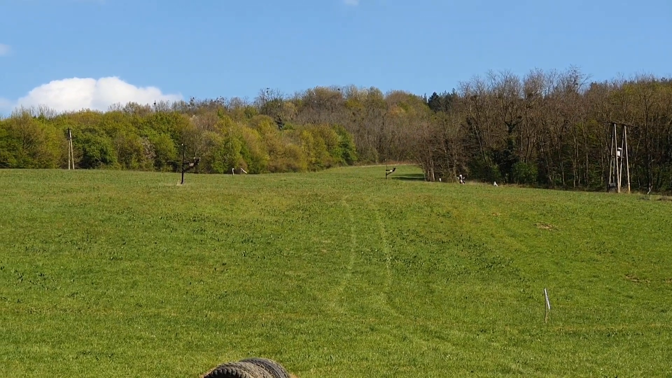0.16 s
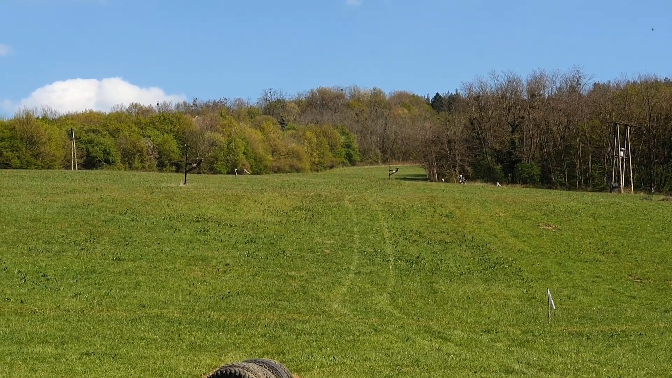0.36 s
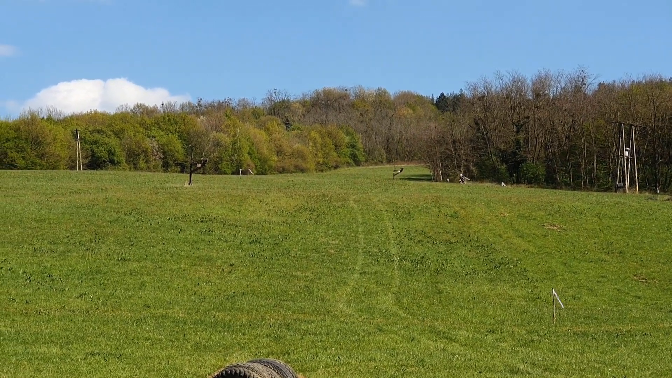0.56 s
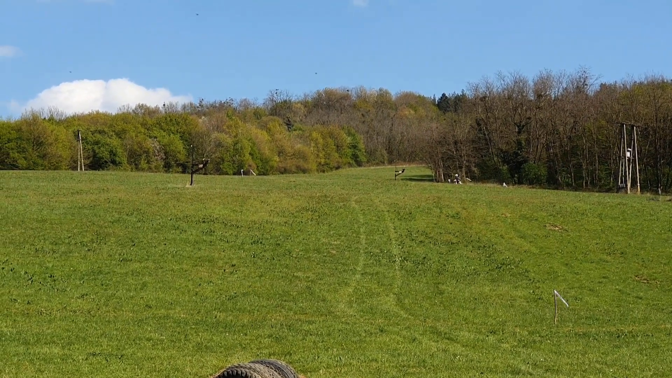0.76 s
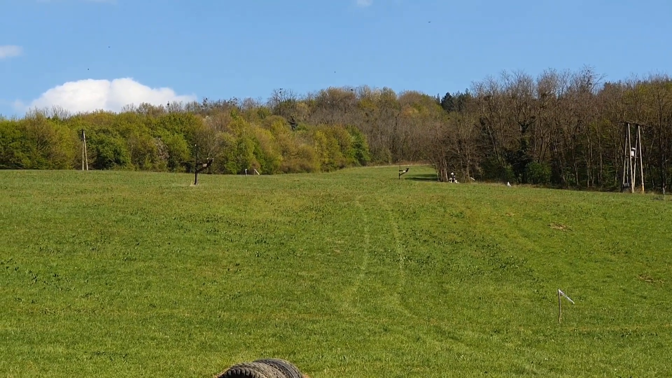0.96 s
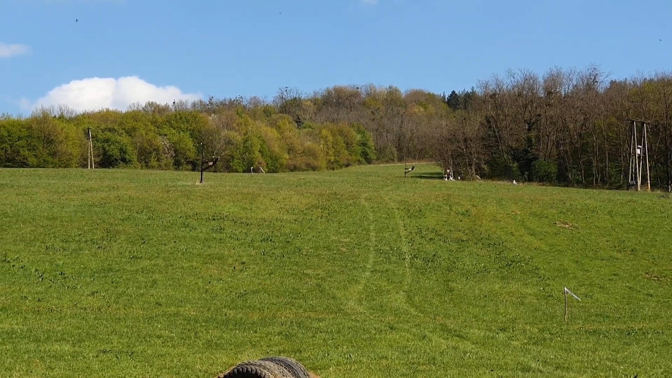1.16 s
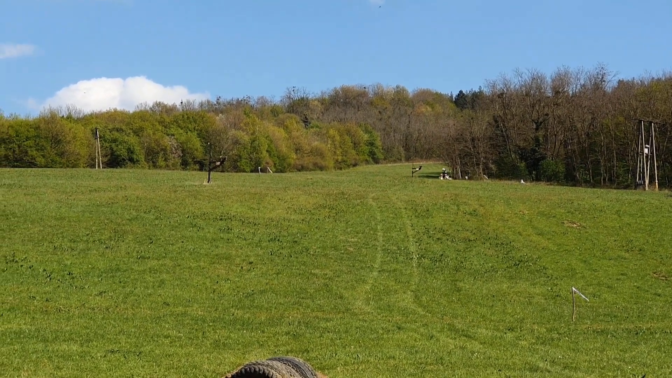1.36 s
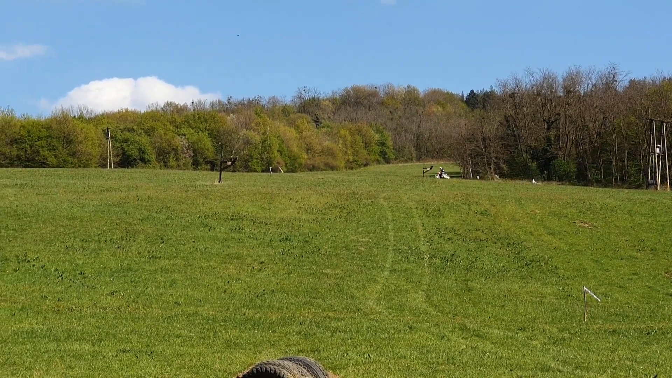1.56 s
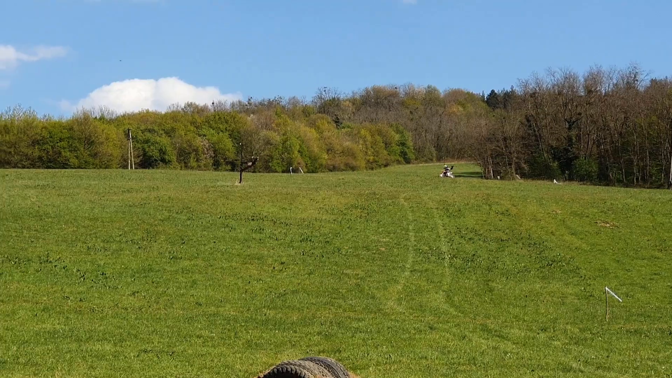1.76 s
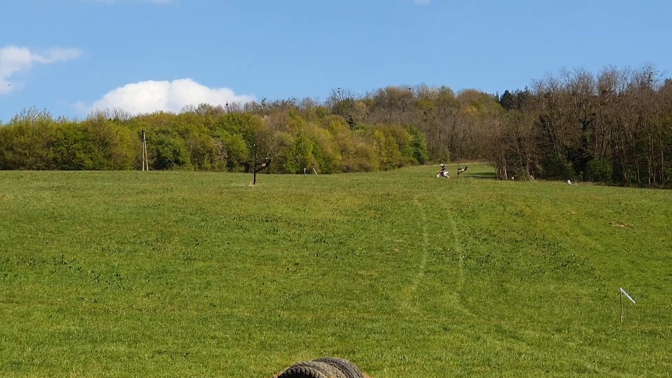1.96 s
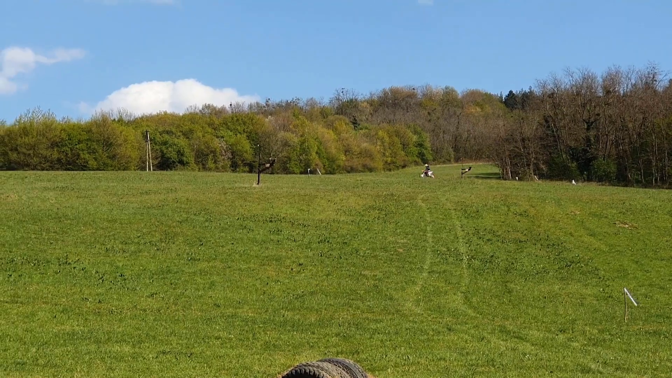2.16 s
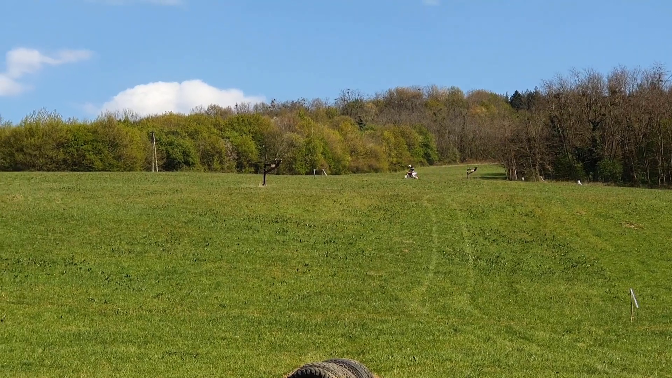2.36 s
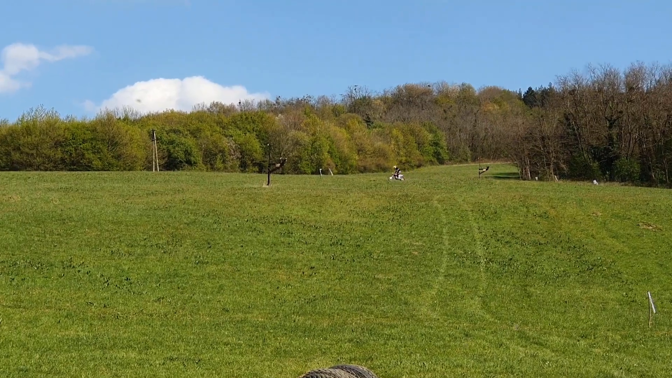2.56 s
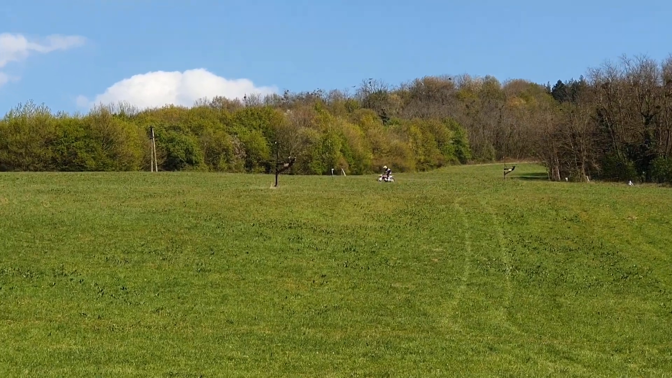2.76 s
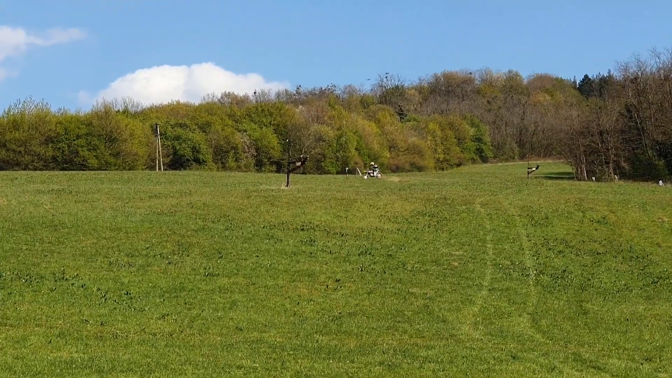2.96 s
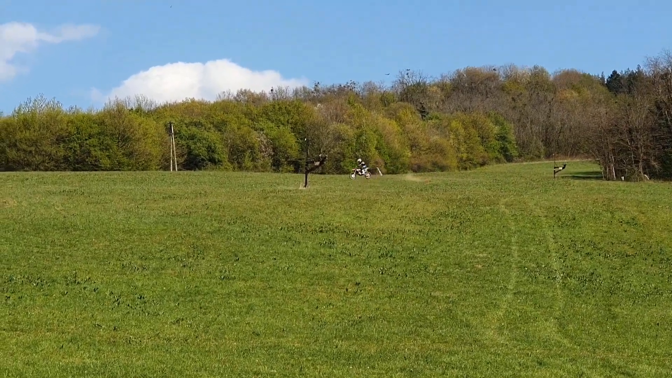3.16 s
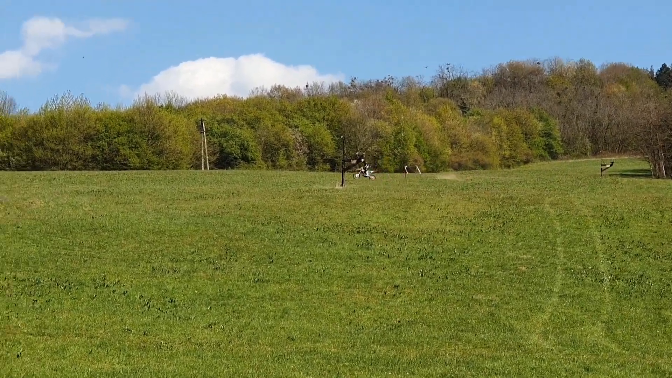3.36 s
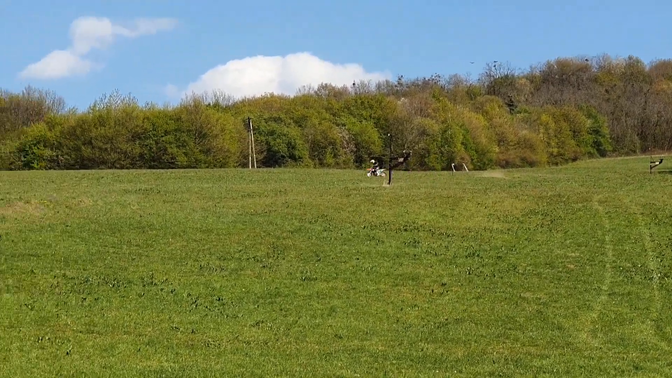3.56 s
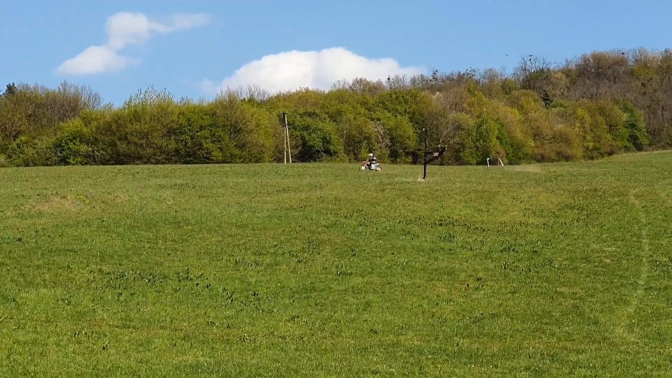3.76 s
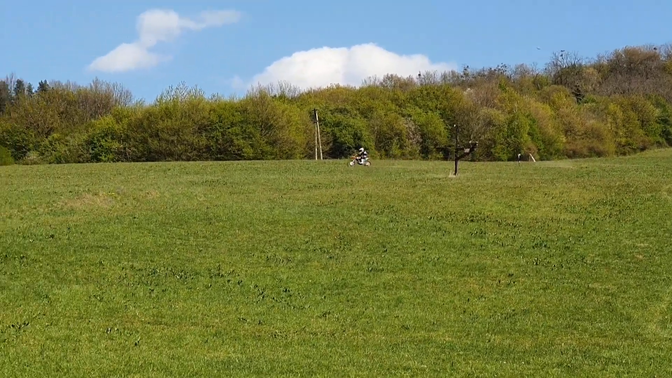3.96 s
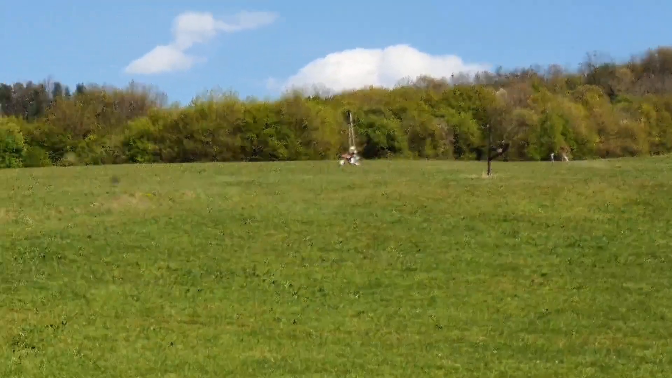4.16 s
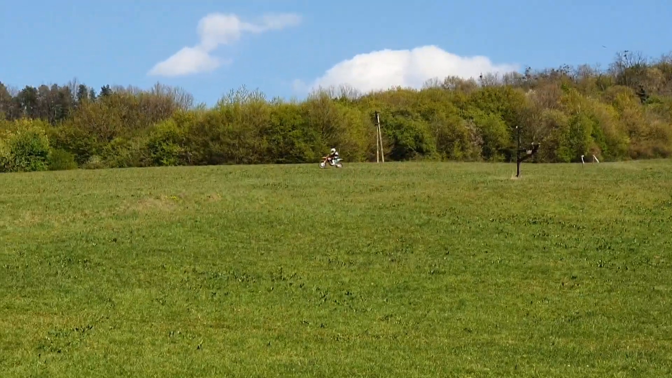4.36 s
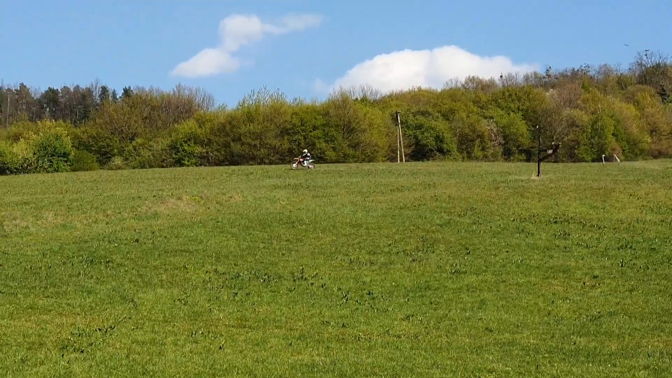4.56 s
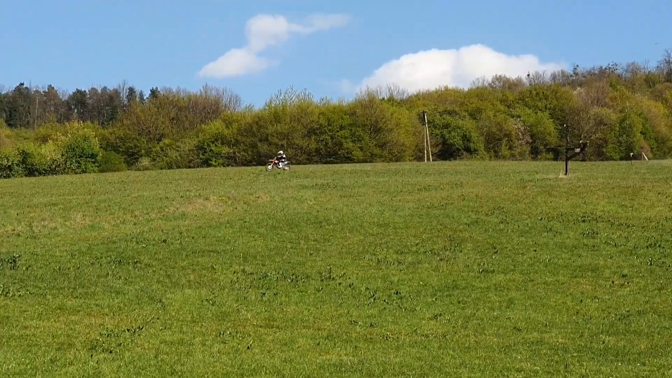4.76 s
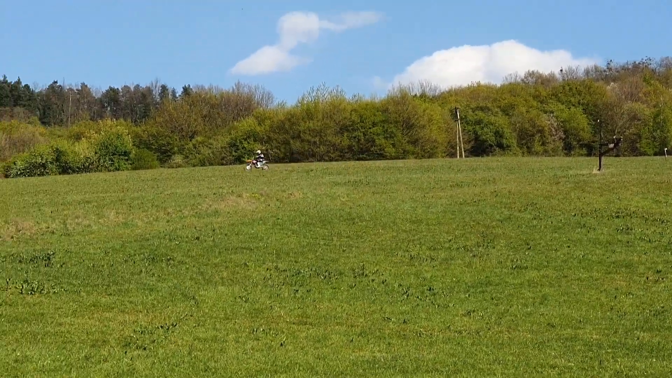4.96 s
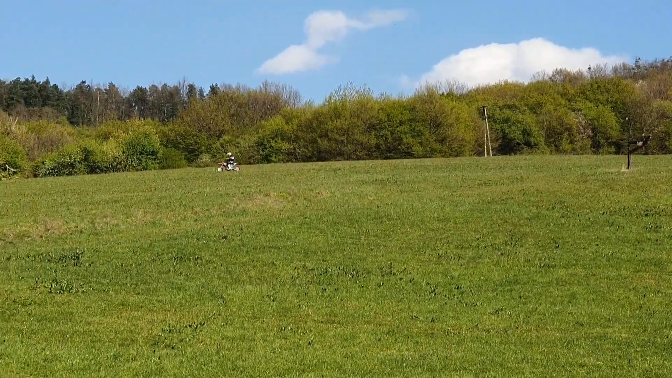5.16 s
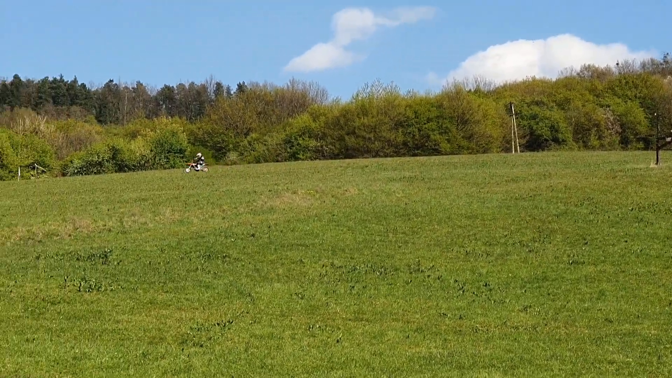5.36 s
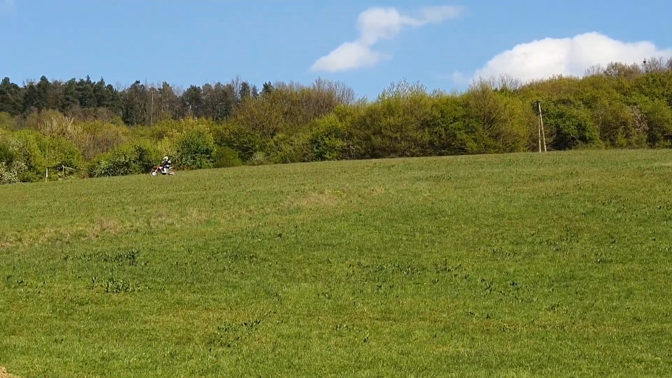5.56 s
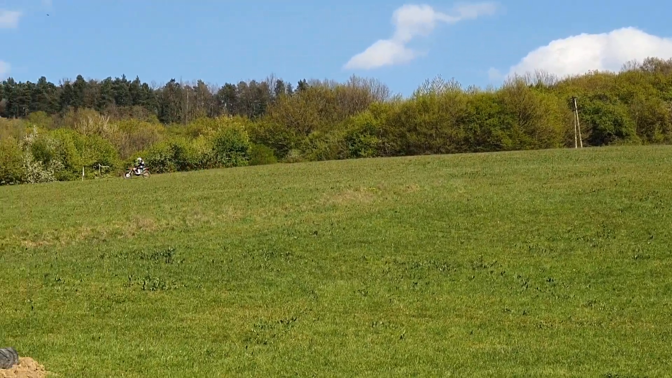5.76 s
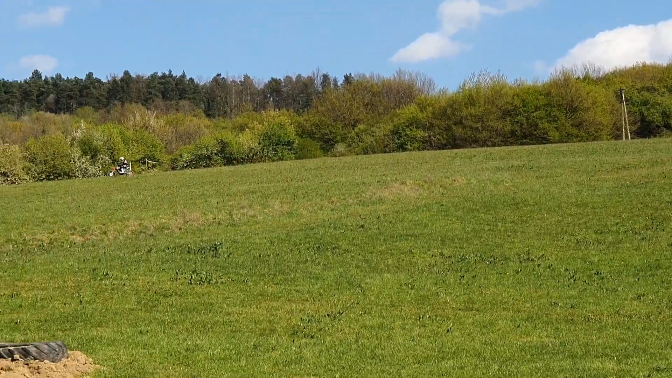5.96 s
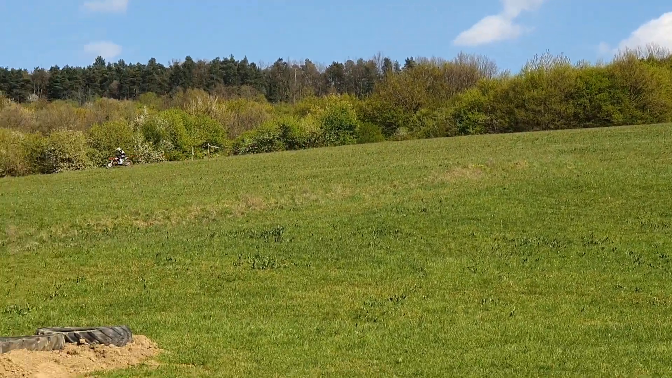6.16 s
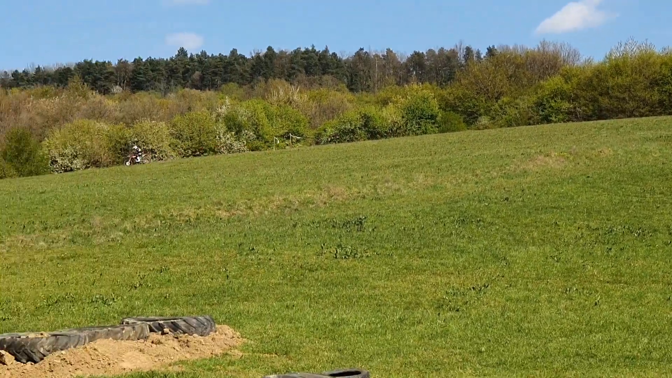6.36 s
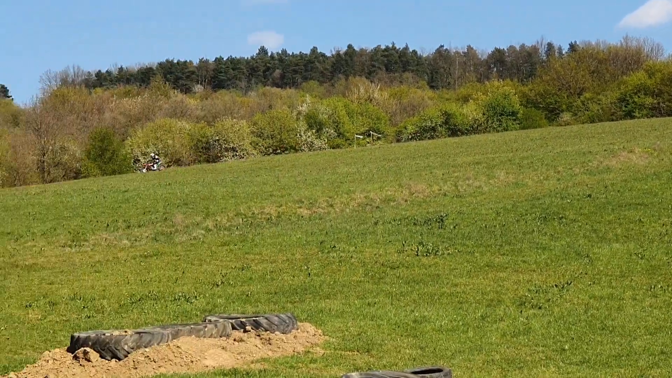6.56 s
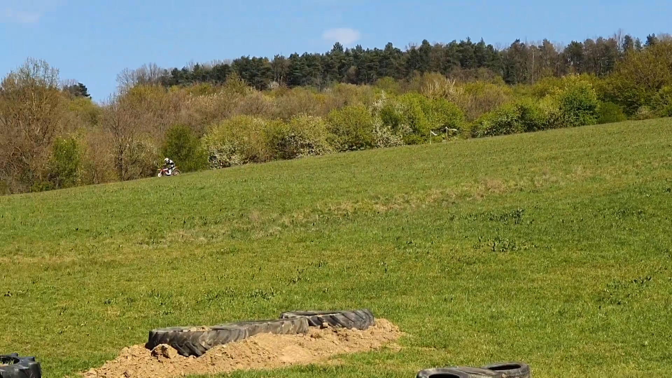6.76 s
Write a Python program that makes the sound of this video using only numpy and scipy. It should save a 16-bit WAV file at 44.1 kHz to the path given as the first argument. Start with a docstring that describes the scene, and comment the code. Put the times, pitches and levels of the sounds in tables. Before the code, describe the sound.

A single-cylinder dirt bike starts far away as a faint low putter, with a few very quiet bird chirps. Its pitch and level climb as it accelerates, then it races across a meadow, revs jumping and dropping over bumps. The exhaust grows into a rasping roar that echoes off the woods. Faint rustles and ticks sound close to the stereo microphone, over a soft outdoor rumble and hiss.

```python
"""Dirt bike on a far meadow

A one-cylinder four-stroke bike climbs out of a dip and crosses a meadow, racing over bumps and
touching its rev limiter. Its firings make a low note, and each one cracks from the pipe. The woods
return the cracks as a rasping roar. Birds whistle there; faint rustles and ticks sound close by."""
import sys
import numpy as np
from scipy import signal
from scipy.fft import rfft, irfft, next_fast_len
from scipy.io import wavfile
from scipy.ndimage import uniform_filter1d, map_coordinates

SR = 44100
rng = np.random.default_rng(int(sys.argv[2]) if len(sys.argv) > 2 else 0)


def put_to_file(sound):
    """Save the sound as 16-bit audio at rate SR, in the file named by the first command-line argument."""
    columns = np.atleast_2d(sound).T  # one column per channel
    safe = np.clip(columns, -1, 1)
    whole_steps = np.round(safe * 32767)
    wavfile.write(sys.argv[1], SR, whole_steps.astype(np.int16))


N = 304290

# Tone colours. Each row: frequency in Hz, relative level in dB.
AIR_COLOUR = [(20, -28.5), (60, -7.5), (120, -3.5), (260, -30.5), (400, -31), (650, -46), (1100, -55.5),
              (1480, -44), (1950, -56.5), (3500, -57), (5200, -67), (6400, -52.5), (7700, -72.5),
              (11200, -54.5), (15500, -77.5)]  # open field and steady hiss
RUSTLE_COLOUR = [(2500, -7), (5000, 11), (9000, -6.5), (12500, -23), (15500, -19.5)]
TICK_COLOUR = [(3000, -2.5), (15000, -4.5)]
FLOW_COLOUR = [(25, -19.5), (60, 2), (160, 7.5), (300, 7), (450, -18), (800, -46.5)]  # low noise in the pipe
RASP_COLOUR = [(240, -25), (400, -6.5), (614, -11), (809, -4.5), (1050, -5.5), (1510, -3.5), (2150, -7.5),
               (2790, -5.5), (4160, -14.5), (6580, -29), (9210, -56), (11600, -59.5), (15500, -80)]
WOODS_COLOUR = [(560, 0), (1120, -0.5), (1500, 1), (2000, 3.5), (2450, 3), (2800, 0), (5000, -3.5)]  # what the longer path by the woods does to the roar
LOW_HARMONIC_COLOUR = [(30, -39), (55, -20), (73, -5.5), (84, 1.5), (98, -9.5), (120, 3), (148, -3),
                       (165, -3.5), (195, 1), (225, -5), (255, -1.5), (295, -3), (335, -7), (400, -19.5)]  # harmonics 1 to 4: tones at 1 to 4 times the firing rate
HIGH_HARMONIC_COLOUR = [(140, 32), (180, 11.5), (260, 5), (310, 5), (400, -6.5), (560, -6.5), (1000, -14.5)]  # harmonics 5 to 12
# Scattered sound. Each row: frequency in Hz, how alike left and right are (1 is the same).
STEREO_LIKENESS = [(35, 0.96), (70, 0.99), (200, 0.97), (600, 0.43), (1300, 0.53), (1800, 0.089),
                   (5000, 0.056)]
# The two microphones' own colours. Each row: frequency in Hz, left minus right in dB.
STEREO_BALANCE = [(380, 0.5), (700, -1), (1290, 4), (2380, -1), (4400, -8), (8120, 4)]
# How far the right side leads. Each row: frequency in Hz, radians with the bike ahead, then to the left.
PHASE_LEAD = [(200, 0, 0), (605, -1, 0.5), (1006, 2.5, -2.5), (2090, -1.5, 1.2), (2900, -2.5, -2),
              (3860, -1.1, 2), (5430, 2, 0.6)]
# Bird notes. Each row: start and length in seconds, first and last pitch in Hz, relative level in dB.
BIRD_NOTES = [(0.208, 0.069, 2250, 2050, -84), (0.435, 0.052, 2570, 2320, -82),
              (0.626, 0.07, 3520, 3300, -86), (0.657, 0.045, 3900, 3580, -79.5),
              (0.711, 0.014, 3820, 2600, -69), (0.819, 0.13, 3580, 3180, -88),
              (1.139, 0.052, 4140, 3850, -88), (1.328, 0.018, 3280, 2430, -77),
              (1.378, .03, 3900, 4100, -90), (1.34, 0.028, 2820, 3130, -71),
              (1.548, 0.018, 2973, 3300, -73), (1.58, 0.019, 2910, 3080, -67),
              (1.86, 0.092, 2450, 2460, -74), (1.883, 0.02, 3210, 2850, -73)]
# Nearby rustles. Each row: start in seconds, relative level in dB.
RUSTLES = [(3.9125, -53.5), (3.9637, -53.5), (4.0659, -52.5), (4.8174, -44), (5.004, -47.5), (5.0286, -52),
           (5.4153, -48.5), (5.434, -56), (5.6186, -53), (6.2366, -49.5), (6.333, -57)]
# Nearby ticks. Each row: start in seconds, relative level in dB, left minus right in dB.
TICKS = [(2.8158, -51, -9.5), (4.891, -43, -25.5), (6.777, -62.5, 1)]
# Engine speed while the rear wheel grips. Each row: time in seconds, firings a second.
GRIP_SPEED = [(0, 30.8), (.15, 28.7), (.33, 28.5), (.43, 32.3), (.9, 36.1), (.98, 40.2), (1.36, 43.6),
              (1.71, 50), (1.93, 55.5), (2.09, 54.1), (2.3, 57.8), (2.57, 68.8), (2.7, 70.5), (2.8, 72.1),
              (3.04, 78), (3.12, 73), (3.2, 73.5), (3.38, 72.1), (3.59, 85), (3.68, 84), (3.94, 81),
              (4.02, 77.5), (4.3, 84.6), (4.55, 76.5), (4.9, 78.4), (5.21, 82.7), (5.73, 86), (5.98, 72.4),
              (6.36, 74.3), (6.61, 75.3), (6.9, 73.5)]
# Bumps lift the wheel and the engine races. Each row: time the tyre bites again, climb time and
# hold time, all in seconds, then top firings a second.
BUMPS = [(1.85, .11, .03, 62.5), (2.0, .07, 0, 62.5), (2.2, .08, .03, 59.6), (2.46, .13, .03, 85.2),
         (2.96, .11, .05, 98.5), (3.3, .09, 0, 82.2), (3.5, .08, .04, 88.7), (3.86, .09, .08, 98.3),
         (4.47, .09, .08, 97.5), (4.82, .15, 0, 82.2), (5.88, .06, .08, 97.6), (6.27, .13, 0, 80.6),
         (6.74, .12, .01, 82.7)]
# The exhaust note. Each row: time in seconds, level in dB.
NOTE_LEVEL = [(0.0, -42), (0.15, -48.5), (0.9, -39), (0.98, -49.5), (2.04, -34.5), (2.08, -38),
              (2.17, -30.5), (2.78, -27), (2.82, -30.5), (2.94, -27.5), (3.11, -32), (3.46, -30),
              (3.65, -35.5), (3.76, -27.5), (3.86, -25.5), (3.9, -28), (4.34, -26), (4.42, -24),
              (4.59, -25.5), (5.8, -21), (6.82, -23), (6.9, -33)]
# Harmonics 5 to 12. Each row: time in seconds, dB added to the note's level before colouring.
HIGH_HARMONIC_LEVEL = [(0, -30), (.9, -43), (1.05, -20), (2.08, -24), (2.15, -17.5), (2.33, -22),
                       (2.5, -22.5), (3.4, -19.5), (3.65, -17), (4.5, -17.5), (4.7, -16.5), (5.2, -16.5),
                       (5.5, -20.5), (5.85, -19.5), (6.3, -18), (6.9, -20.5)]
# The path over the grass. Each row: time in seconds, loss in dB per octave above SHADE_HZ,
# frequency in Hz that the ground's echo cancels, depth of that notch in dB.
GROUND_PATH = [(0, 27, 91, 20), (.5, 25, 94, 16), (.9, 40, 105, 12), (1.0, 13, 121, 8), (1.4, 10, 150, 17),
               (1.8, 15, 192, 26), (2.0, 18.5, 189, 11), (2.18, 4, 238, 16.5), (2.33, 24, 246, 23.5),
               (2.41, 6.5, 190, 1), (2.52, 14, 168, 3), (2.58, 15, 296, 14), (2.82, -7, 313, 28),
               (2.92, 3, 318, 9), (3.05, -3.5, 317, 25), (3.3, -5, 310, 15), (3.47, 15, 315, 13.5),
               (3.52, 23, 270, 12), (3.67, 17.5, 258, 10.5), (3.75, 5, 278, 6), (4.3, 8.5, 268, 3),
               (4.44, -0.5, 293, 19), (4.54, 11, 300, 4.5), (5.2, 8, 324, 1.5), (5.8, -3.5, 390, 5.5),
               (6.0, 10.5, 381, -1.5), (6.9, 24.5, 306, -7)]
# The rasp. Each row: time in seconds, level of its middle in dB, low and high parts in dB against that.
RASP_LEVELS = [(0.0, -72, 8, -13), (0.07, -68, -6, -10), (.4, -74, -3.5, -15), (1.11, -78, -10, -6),
               (1.4, -68, -6, -22), (1.63, -58, -9, -16.5), (1.88, -53.5, -9, -26.5),
               (2.185, -53, -7.5, -19), (2.215, -48.5, -12, -11.5), (2.44, -43, -7, -14.5),
               (2.78, -39.5, -2, -12), (3.15, -42, -1, -12.5), (3.55, -43.5, -2, -14),
               (3.71, -45.5, -3.5, -18.5), (3.78, -41, -7, -13.5), (4.4, -41, -5.5, -12.5),
               (4.78, -36.5, -4.5, -10.5), (5.77, -36, -11.5, -10), (5.86, -39, -4, -12.5),
               (6.25, -37.5, -8.5, -8), (6.69, -35.5, -10, -10.5), (6.9, -41, -6, -10.5)]
# Rasp heard as direct cracks. Each row: time in seconds, share from 0 to 1.
DIRECT_SHARE = [(0, 0.18), (2.8, 0.09), (3.7, 0.04), (4.5, 0.16), (4.9, 0.22), (5.7, 0.32), (5.9, 0.15),
                (6.3, 0.45), (6.9, 0.39)]
# The pipe swings briefly towards the listener. Each row: middle and length in seconds, lift in dB,
# extra lift of the high part in dB, crack sharpness from 0 to 1.
PIPE_SWINGS = [(4.75, 0.077, 5, 0.5, 0.03), (5.061, 0.037, 1.5, 3.5, 0.02), (5.183, 0.049, 1, 4, 0),
               (5.61, 0.076, 2.5, 2.5, .05), (6.658, 0.18, 1.5, 3.5, 0.41)]
# The ground's echo cancels parts of the rasp. Each row: centre and width in Hz, depth per pass in dB.
RASP_NOTCHES = [(1100, 61, 2.5), (2090, 240, 1.5), (2723, 160, 3)]
# The silencer's ringing end cap. Each row: time in seconds, pitch in Hz, level in dB.
CAP_RING = [(5.7, 4170, -75.5), (5.95, 4110, -51.5), (6.25, 4190, -47.5), (6.405, 4400, -56),
            (6.435, 4350, -37), (6.47, 3450, -41), (6.5, 3900, -58.5)]

LIMITER_HZ = 97.42  # above this firing rate every third spark is cut
SHADE_HZ = 203.7  # the path over the grass tilts the note above this


def amp(db):
    """Turn decibels into a gain."""
    return 10 ** (np.asarray(db) / 20)


def unit(x):
    """Scale a signal to an average power of 1."""
    return x / np.sqrt(np.mean(x ** 2) + 1e-20)


def along(points, hz):
    """Read a table at any frequency, on a scale of octaves."""
    freqs, values = np.transpose(points)
    return np.interp(np.log(hz + 1), np.log(freqs + 1), values)


def curves(rows):
    """Turn each column after the time into one value per sample."""
    times, *columns = np.transpose(rows)
    return [np.interp(np.arange(N) / SR, times, column) for column in columns]


def wobble(rate):
    """A smooth random curve through `rate` points a second."""
    return map_coordinates(rng.standard_normal(int(N * rate / SR) + 4), [np.arange(N) * rate / SR])


def filtered(x, response):
    """Give each frequency the gain response(hz)."""
    size = next_fast_len(x.shape[-1] + 8192)
    return irfft(rfft(x, size) * response(np.fft.rfftfreq(size, 1 / SR)), size)[..., :N]


def coloured(x, colour):
    """Filter a signal with a tone colour table."""
    return filtered(x, lambda hz: amp(along(colour, hz)))


def moved_left():
    """0 while the bike is ahead, rising to 1 as it moves to the left."""
    return np.interp(np.arange(N) / SR, (4.1, 5.4), [0, 1])


def far_noise(colour, patch_db):
    """Stereo noise that swirling air makes louder and softer in random patches."""
    def middle_and_side(hz):
        angle = np.arccos(along(STEREO_LIKENESS, hz)) / 2
        return amp(along(colour, hz)) * [np.cos(angle), np.sin(angle)]

    spectra = signal.stft(rng.standard_normal((2, N)), nperseg=256)[2]
    patches = uniform_filter1d(rng.standard_normal(spectra.shape[1:]), size=4, axis=0)
    patches = unit(uniform_filter1d(patches, size=14, axis=1))
    noise = signal.istft(spectra * amp(patch_db * patches), nperseg=256)[1][:, :N]
    middle, side = filtered(noise, middle_and_side)
    return unit(np.array([middle + side, middle - side]))


def tree_echo(x, fade_s):
    """The trees scatter a sound into a stereo tail that falls 60 dB in fade_s."""
    t = np.arange(SR) / SR
    tail = rng.standard_normal((2, SR)) * amp(-60 * t / fade_s) * (t > .006)
    return signal.fftconvolve(x, tail / np.linalg.norm(tail[0]), axes=1)[:, :N]


def birds():
    """Short gliding whistles that echo among the trees."""
    song = np.zeros(N)
    for start, length, first_hz, last_hz, db in BIRD_NOTES:
        progress = np.linspace(0, 1, round(length * SR))
        phase = 2 * np.pi * np.cumsum(first_hz + (last_hz - first_hz) * progress) / SR
        song[round(start * SR):][:len(phase)] += amp(db + 16.5) * np.sin(np.pi * progress) * np.sin(phase)
    song *= amp(4.3 * wobble(160))  # a scratchy edge
    echo = tree_echo(unit(wobble(400)) * song[None], fade_s=.33)
    return song * amp([[-5], [-1]]) + amp(-5) * echo


def contacts(events, rise_s, fade_s, colour):
    """Light touches close by, each a brief burst of noise."""
    out, t = np.zeros((2, N)), np.arange(SR // 10) / SR
    shape = (1 - np.exp(-t / rise_s)) ** 2 * amp(-60 * t / fade_s)
    for start, db, *pan_db in events:
        gains = amp(db + np.array([[.5], [-.5]]) * sum(pan_db))
        out[:, round(start * SR):][:, :len(t)] += gains * shape * rng.standard_normal((2, len(t)))
    return coloured(out, colour)


def firing_rate(bite_s=.09, bounce_hz=7.7, bounce_s=.15):
    """The engine races at each bump, the ground drags it back, then the suspension rocks its speed."""
    t = np.arange(0, N / SR, .001)
    grip = rate = np.interp(t, *np.transpose(GRIP_SPEED))
    for bite, climb, hold, top in BUMPS:
        racing = np.interp(t, [bite - hold - climb, bite - hold, bite, bite + bite_s], [0, 1, 1, 0])
        after = np.maximum(t - bite - bite_s, 0)
        rocking = .22 * np.sin(np.pi * bounce_hz * after) ** 2 * np.exp(-after / bounce_s)
        rate = rate + (racing + rocking) * (top - grip)
    return np.interp(np.arange(N) / SR, t, rate)


def metal_ring(cycle, rate, hz, level_db, spread_octaves, fade_s=.015):
    """A short metallic ring after every firing, each with its own strength and pitch."""
    firing, since = np.floor(cycle + .1).astype(int), (cycle + .1) % 1 / rate
    strength, detune = rng.standard_normal((700, 2))[firing].T
    shape = amp(2.5 * strength - 60 * since / fade_s) * (1 - np.exp(-since / .0006))
    pitch = hz * 2 ** (spread_octaves * detune)
    return amp(level_db) * unit(shape * np.sin(2 * np.pi * pitch * since))


def pipe_swings():
    """Smooth rises in level, brightness and sharpness as the pipe points at the listener."""
    t = np.arange(0, N / SR, .005)
    humps = sum(np.exp(-(2 * (t - middle) / length) ** 2) * np.array(lifts)[:, None]
                for middle, length, *lifts in PIPE_SWINGS)
    return curves(np.vstack([t, humps]).T)


def ground_notches(hz):
    """The gain left where the ground's echo partly cancels the rasp."""
    return amp(-sum(db * np.exp(-((hz - centre) / width) ** 2) for centre, width, db in RASP_NOTCHES))


def pipe_cracks(cycle, rate, sharpness, fade_s=.014):
    """Each firing cracks from the pipe end: a burst of noise with three pitches of its own."""
    firing, since = np.floor(cycle + .12), (cycle + .1034) % 1 / rate
    strength = amp(1.5 * rng.standard_normal(700))[firing.astype(int)]
    # Half a row of noise per firing, so each crack resembles the last few.
    noise = map_coordinates(rng.standard_normal((700, SR // 20)), [.5 * firing, since * SR])
    crack = strength * amp(-60 * since / fade_s) * noise
    pings = sum(metal_ring(cycle, rate, hz=4000, level_db=-23, spread_octaves=.6) for _ in range(3))
    treble = filtered(crack, lambda hz: 1 / (1 + (7500 / (hz + 1)) ** 8) / (1 + (hz / 10300) ** 16))
    edge = amp(32) * sharpness ** 2 * treble  # a clear path keeps the sharp front
    return unit(coloured(crack + edge + pings, RASP_COLOUR))


def exhaust_rasp(cycle, rate):
    """Some cracks arrive directly; the woods smear the rest into a roar."""
    level_db, low_db, high_db = curves(RASP_LEVELS)
    lift_db, high_lift_db, sharpness = pipe_swings()
    share, = curves(DIRECT_SHARE)
    cracks = pipe_cracks(cycle, rate, sharpness)
    roar = unit(coloured(far_noise(RASP_COLOUR, patch_db=1), WOODS_COLOUR))
    both = np.sqrt(share) * cracks + np.sqrt(1 - share) * roar
    low = filtered(both, lambda hz: 1 / (1 + (hz / 1050) ** 8) / (1 + (650 / (hz + 1)) ** 8))
    high = filtered(both, lambda hz: 1 / (1 + (3650 / (hz + 1)) ** 8))
    middle = unit(both - low - high)
    lifted = amp(lift_db) * (middle + amp(high_db + high_lift_db) * unit(high))
    rasp = filtered(amp(level_db) * (amp(low_db) * unit(low) + lifted), ground_notches)
    skimming = filtered(rasp, ground_notches)  # skimming the crest, the notches are twice as deep
    return moved_left() * rasp + (1 - moved_left()) * skimming


def low_harmonic_levels(rate, note_db):
    """Pipe and ground share the note's level among the first four harmonics, in dB."""
    shade_db, notch_hz, notch_db = curves(GROUND_PATH)
    hz = rate * np.arange(1, 5)[:, None]
    db = along(LOW_HARMONIC_COLOUR, hz) - shade_db * np.log2(np.maximum(hz / SHADE_HZ, 1))
    db -= notch_db * np.exp(-(np.log2(hz / notch_hz) / .21) ** 2)
    db[0] -= 4.5 * moved_left()  # the deepest tone weakens
    db += 1.5 * np.array([wobble(9) for _ in hz])  # moving air makes each swell and fade
    return note_db + db - 10 * np.log10(np.sum(amp(db) ** 2, axis=0))


def exhaust_note(cycle, rate, note_db):
    """The train of firings makes twelve harmonics; the rev limiter adds two tones off that series."""
    levels = list(low_harmonic_levels(rate, note_db))
    high_db = note_db + curves(HIGH_HARMONIC_LEVEL)[0]
    strength = map_coordinates(rng.standard_normal(700), [cycle])  # no two firings are equal
    sway = .24 * wobble(24)  # the rear wheel's speed wavers over rough ground
    for k in range(5, 13):
        levels.append(high_db + along(HIGH_HARMONIC_COLOUR, k * rate) - 2.5 * (k - 5) + 1.5 * wobble(7))
    phase, tone = 2 * np.pi * cycle, np.zeros(N)
    for k, db in enumerate(levels, 1):
        gain = amp(db + 3 + .3 * strength + .5 * wobble(20))
        tone += gain * np.cos(k * (phase + sway) + .4 * k * k + .12 * wobble(6))
    limiting = 1 / (1 + np.exp(-(rate - LIMITER_HZ) / .4))
    # One spark in three missing gives tones at thirds of the firing rate.
    stutter = amp(levels[1] - 2) * np.cos(phase * 4 / 3) + amp(levels[1] - 13.5) * np.cos(phase * 2 / 3)
    return tone + limiting * stutter


def dirt_bike():
    """The exhaust note and its echo, gas rushing in the pipe, the rasp and the ringing end cap."""
    rate = firing_rate()
    cycle = np.cumsum(rate) / SR  # firings so far
    note_db, = curves(NOTE_LEVEL)
    tone = exhaust_note(cycle, rate, note_db)[None]
    effort = np.sqrt(uniform_filter1d(amp(note_db) ** 2, size=SR // 5))
    flow = amp(-16.5) * effort * far_noise(FLOW_COLOUR, patch_db=2.5)
    echo = amp(-13 - 4 * moved_left()) * tree_echo(tone, fade_s=.98)
    echo = echo.mean(axis=0) + echo / 12  # nearly the same on both sides
    flutter = amp(-33.5) * tone * wobble(50)  # uneven burning smears each harmonic
    pan = amp(-1.4 * moved_left() * [[.5], [-.5]])
    rasp = exhaust_rasp(cycle, rate)
    cap = metal_ring(cycle, rate, *curves(CAP_RING), spread_octaves=.026)
    cap *= np.arange(N) > CAP_RING[0][0] * SR  # silent before its first row
    return tone * pan + flutter + flow + echo + rasp + cap


def scene():
    """The bike over the air, birds, rustles and ticks, in stereo."""
    air = amp(-46) * far_noise(AIR_COLOUR, patch_db=2)
    meadow = air + dirt_bike() + birds()
    rustles = amp(17) * contacts(RUSTLES, rise_s=.0034, fade_s=.054, colour=RUSTLE_COLOUR)
    ticks = amp(14) * contacts(TICKS, rise_s=.0001, fade_s=.0044, colour=TICK_COLOUR)
    return meadow + rustles + ticks


def record(dry, top_hz=15800):
    """Two microphones colour the sound, shift its phase with the bike's direction and cut the top."""
    freqs, lead_ahead, lead_left = np.transpose(PHASE_LEAD)

    def heard_with(lead):
        def response(hz):
            left_over_right = amp(along(STEREO_BALANCE, hz)) * np.exp(-1j * np.interp(hz, freqs, lead))
            return left_over_right ** np.array([[.5], [-.5]]) * (hz < top_hz)
        return filtered(dry, response)

    share = np.sin(moved_left() * np.pi / 2) ** 2
    blend = (1 - share) * heard_with(lead_ahead) + share * heard_with(lead_left)
    return filtered(blend, lambda hz: hz < top_hz)


dry = scene()
out = record(dry)
put_to_file(out)
```